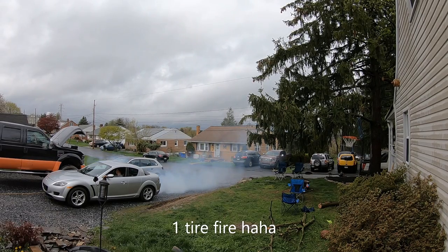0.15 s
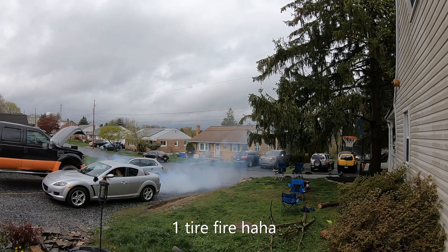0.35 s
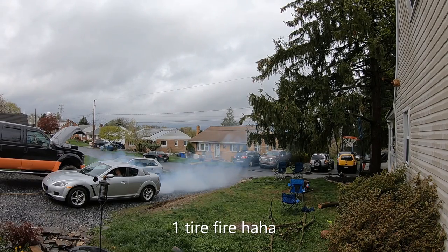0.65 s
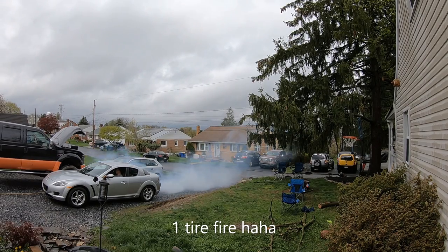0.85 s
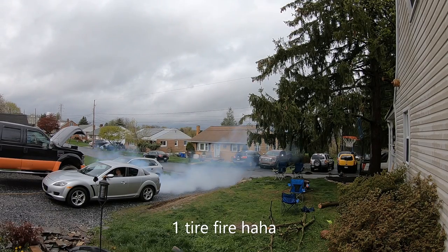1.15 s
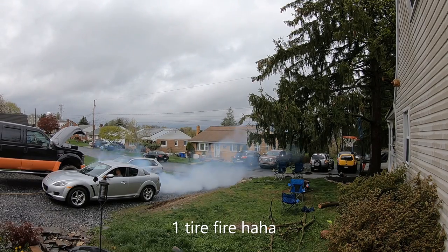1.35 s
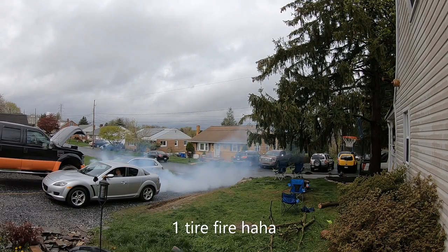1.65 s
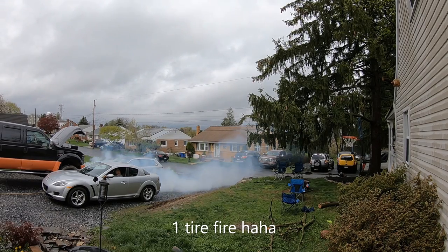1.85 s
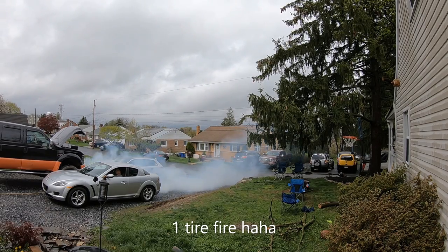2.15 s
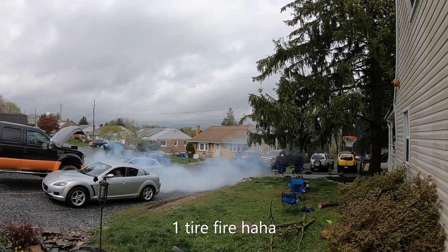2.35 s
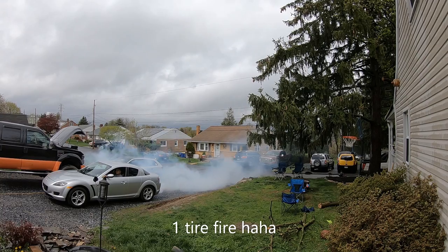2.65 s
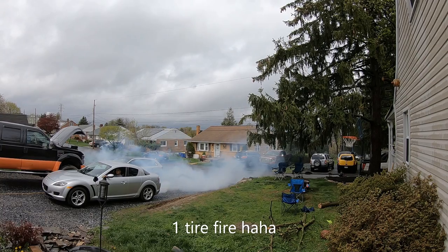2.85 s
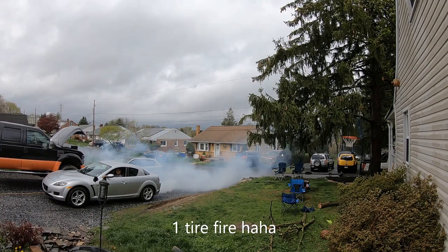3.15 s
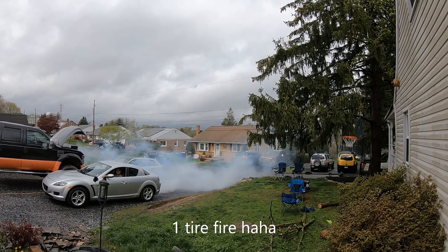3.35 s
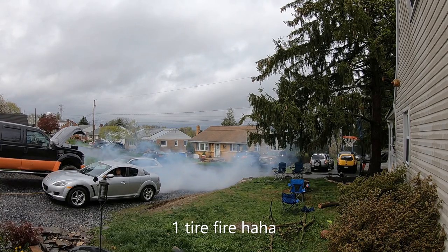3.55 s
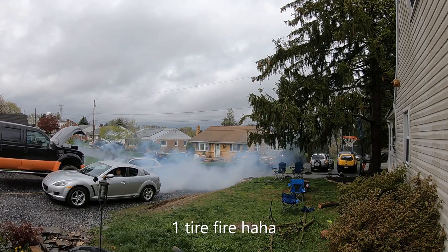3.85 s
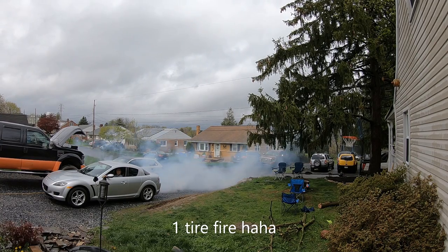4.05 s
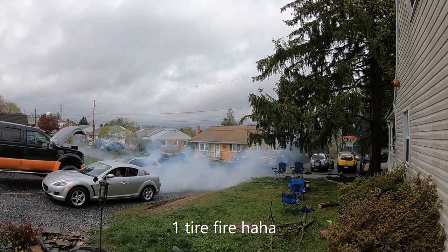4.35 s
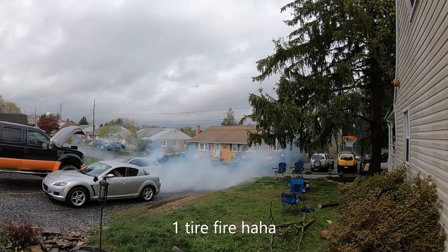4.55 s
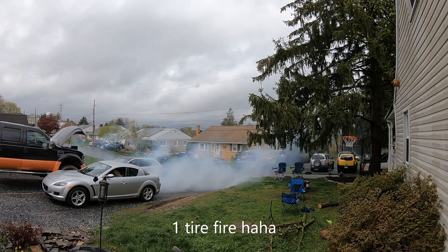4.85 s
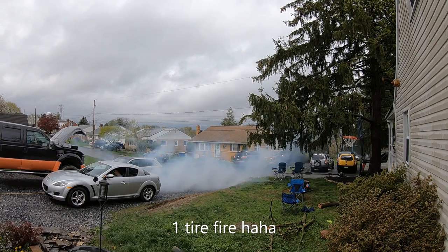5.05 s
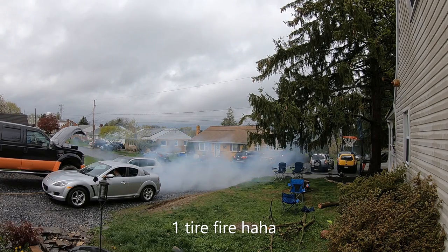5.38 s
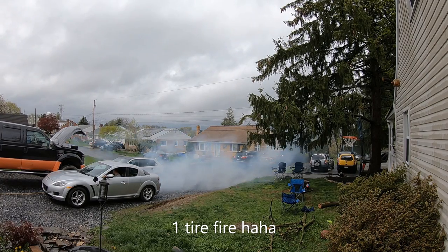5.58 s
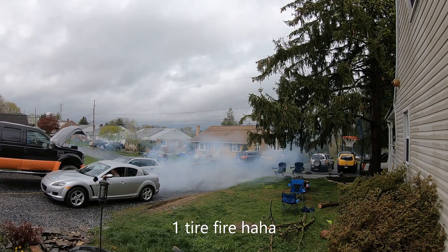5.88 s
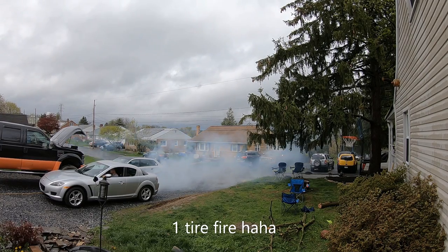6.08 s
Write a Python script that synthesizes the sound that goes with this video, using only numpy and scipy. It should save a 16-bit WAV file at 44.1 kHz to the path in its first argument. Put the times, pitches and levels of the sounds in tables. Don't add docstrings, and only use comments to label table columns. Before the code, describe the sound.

A loud open-exhaust car engine howls at high revs, labours down raspingly, drops with two small pops to a lumpy idle, then begins revving up again.

```python
import sys
import numpy as np
from scipy import signal
from scipy.fft import rfft, irfft, next_fast_len
from scipy.io import wavfile
from scipy.ndimage import uniform_filter1d, map_coordinates

SR = 44100
rng = np.random.default_rng(int(sys.argv[2]) if len(sys.argv) > 2 else 0)


def invert_db(level):
    return 10 ** (np.asarray(level, dtype=float) / 20)


def generate_wav(sig):
    pcm = np.round(np.clip(np.atleast_2d(sig).T, -1, 1) * 32767).astype(np.int16)
    wavfile.write(sys.argv[1], SR, pcm)


N = 274302

# time_s, firing_rate_hz
FIRING_RATE = [(0, 170.8), (.09, 164.6), (.16, 151.8), (.28, 119.3), (.6, 109.3), (1, 90.9), (1.3, 82.06),
               (1.8, 74.95), (1.92, 61.25), (2.03, 55.35), (2.15, 46.59), (2.33, 38.95), (2.54, 33.41),
               (3.2, 34.9), (4.15, 32.35), (5.2, 32.53), (5.42, 34.01), (6.22, 51)]
# time_s, level_db
BOOM_LEVEL = [(.09, -10), (.16, -14.5), (.24, -12.5), (.3, -14), (.55, -16.5), (.7, -21), (.8, -15.5),
              (1.05, -11.5), (1.8, -14), (1.86, -17), (2.04, -17), (2.18, -23), (2.32, -17.5), (2.5, -23.5),
              (2.65, -22), (5.45, -23), (5.64, -20.5), (6.22, -19.5)]
# time_s, flow_db
GAS_FLOW = [(0, -29.5), (.08, -33), (.13, -26), (.21, -27.5), (.33, -34), (1.1, -34), (1.8, -35.5),
            (1.9, -40.5), (1.98, -50), (2.15, -57), (2.27, -50.5), (5.46, -53.5), (5.56, -48.5), (5.9, -45),
            (6.22, -41)]
# firing_rate_hz, late_ms
ROTOR_LATENESS = [(50, .15), (75, .06), (82, .04), (91, .15), (102, .16), (111, .06), (170, .01)]
# pitch_hz, level_db
BOOM_SHUT = [(20, -52.5), (33, -31.5), (66, -2), (101, -7.5), (132, 2), (163, 5.5), (192, -2), (207, -5.5),
             (232, -3.5), (258, -11), (285, -37.5), (335, -14.5), (380, -25), (450, -54.5)]
# pitch_hz, level_db
BOOM_LOAD = [(30, -55), (76, -15), (104, -13), (116, -4), (140, -12.5), (175, 1), (207, -4.5), (238, -3.5),
             (268, -6.5), (308, -20), (337, -9.5), (362, -17), (405, -16), (470, -65.5)]
# pitch_hz, width_hz, depth_db
SIDE_BRANCH_DIPS = [(68.2, 5.2, -8.5), (95.4, 8.1, -9.5), (205.1, 9.3, -15.5), (313, 16, -7),
                    (361, 16, -7.5)]
# pitch_hz, width_hz, level_db
BARK_MODES = [(425, 25, -4), (470, 22, -8), (505, 26, -7), (542, 28, -2), (585, 28, 0), (665, 22, -7),
              (735, 22, -4), (795, 28, -6), (942, 24, -1), (1145, 22, -4)]
# pitch_hz, level_db
JET_SPECTRUM = [(600, -12.5), (1000, -14), (1500, -17), (2500, -19.5), (4400, -20), (6200, -18),
                (8100, -22.5), (10100, -30.5), (11200, -38), (13200, -37.5), (15500, -61.5)]
# pitch_hz, width_hz, shut_level_db, load_level_db
TAIL_PIPE_MODES = [(1380, 30, 13, -6), (1690, 60, -30, 9), (1755, 28, -2, -10), (1950, 32, -30, 2),
                   (2110, 80, 5, -4), (2310, 26, -12, 0), (2760, 30, 0, -20), (2970, 45, -3, -6),
                   (3290, 45, 2, -6), (3440, 90, -8, 2), (3950, 60, 0, -12), (4250, 60, 0, -30),
                   (4500, 100, -1, -5), (5520, 90, -20, -7), (5850, 50, -3, -20), (6350, 70, -6, -8)]
# start_s, peak_db
AFTERFIRES = [
    (2.358, -25),
    (2.4157, -33.5),
]
# pitch_hz, t60_s
YARD_DECAY = [(100, 0.85), (1000, 1), (8000, 0.037)]
# pitch_hz, level_db
AIR_SPECTRUM = [(20, -12), (40, 0), (200, -8), (600, -24), (2000, -34), (7000, -38), (11000, -55),
                (16000, -90)]


def unit(x):
    return x / np.sqrt(np.mean(x ** 2) + 1e-20)


def steady(x, span_s):
    width = round(span_s * SR)
    power = uniform_filter1d(uniform_filter1d(x ** 2, width), width // 2)
    return x / np.sqrt(np.abs(power) + 1e-12)


def curve(rows):
    s, value = np.transpose(rows)
    return np.interp(np.arange(N) / SR, s, value)


def along(points, hz):
    f, v = np.transpose(points)
    return np.interp(np.log(hz + 1), np.log(f + 1), v)


def wobble(rate_hz):
    knots = rng.standard_normal(int(N * rate_hz / SR) + 4)
    return map_coordinates(knots, [np.arange(N) * rate_hz / SR])


def filtered(x, response, before=0):
    m = 2 * next_fast_len(N // 2 + SR // 4)
    long = np.concatenate([x, np.zeros(m - N - before), x[:before]])
    return irfft(rfft(long) * response(np.fft.rfftfreq(m, 1 / SR)), m)[:N]


def causal(points):
    def response(hz):
        cepstrum = irfft(np.log(invert_db(along(points, hz)) + 1e-6))
        half = len(cepstrum) // 2
        cepstrum[1:half] *= 2
        cepstrum[half + 1:] = 0
        return np.exp(rfft(cepstrum))
    return response


def modes(f, table):
    total = 0
    for k, (c, w, db) in enumerate(table):
        total = total + (-1) ** k * invert_db(db) * 1j * f * w / (c * c - f * f + 1j * f * w)
    return total


def pulses(at, size):
    cell = np.clip(np.floor(at), 0, N).astype(int)
    part = at - cell
    first = np.bincount(cell, size * (1 - part), N + 2)
    second = np.bincount(cell + 1, size * part, N + 2)
    return (first + second)[:N]


def firings(rate):
    turns = np.cumsum(rate) / SR + 0.297
    count = np.arange(1, int(turns[-1]) + 1)
    at = np.interp(count, turns, np.arange(N))
    rotor = (-1) ** count
    late_ms = along(ROTOR_LATENESS, rate)[at.astype(int)]
    jitter_ms = 0.017 * rng.standard_normal(len(at))
    return at + SR / 1000 * (rotor * late_ms + jitter_ms), rotor


def silencer(f):
    centre_hz, width_hz = 153.7, 102.4
    real, imag = centre_hz ** 2 - f * f, 1j * f * width_hz
    return (real - imag) / (real + imag)


def notches(f):
    dips = [(c * c - f * f + 1j * f * w * invert_db(db)) / (c * c - f * f + 1j * f * w)
            for c, w, db in SIDE_BRANCH_DIPS]
    return np.prod(dips, axis=0)


def pipe_boom(at, rotor, load, load_at_firing):
    stumble_db = 2.5 * load_at_firing * (1 - load_at_firing)
    blows = pulses(at, -invert_db(0.3 * rotor + (0.5 + stumble_db) * rng.standard_normal(len(at))))
    before = round(at[12] - at[0])
    boom = filtered(blows * (1 - load), causal(BOOM_SHUT))
    boom = boom + filtered(blows * load, causal(BOOM_LOAD), before=before)
    return filtered(boom, lambda f: silencer(f) * notches(f) * (1 + 1j * f / 900) ** -4, before=before)


def gas_puffs(at, rotor):
    t = np.arange(SR // 10) / SR
    puff = (1 - np.exp(-t / 0.0025)) * np.exp(-(t / 0.024) ** 3)
    size = invert_db(2.8 * rotor + 0.8 * rng.standard_normal(len(at)))
    flow = signal.fftconvolve(pulses(at, size), puff)[:N]
    return steady(0.7 + np.abs(flow), 0.15)


def pipe_bark(at, rotor, load, load_at_firing, flow):
    luck = rng.standard_normal(len(at))
    edge = pulses(at, invert_db(3.5 * (1 - load_at_firing) * rotor + 0.6 * luck))
    edge = edge + 0.6 * (1 - load) * np.roll(edge, round(0.0119 * SR))
    turbulence = (1 + flow) * rng.standard_normal(N)
    rounded = lambda f: modes(f, BARK_MODES) / (1 + 1j * f / 1300) ** 4
    return unit(filtered(edge, rounded)) + (0.22 + 0.5 * load) * unit(filtered(turbulence, rounded))


def patchy(depth_db):
    hz, t, z = signal.stft(rng.standard_normal(N), SR, nperseg=512)
    field = uniform_filter1d(rng.standard_normal(z.shape), size=3, axis=0)
    field = uniform_filter1d(field, size=4, axis=1)
    by_pitch = np.clip(hz / 3000, 0, 1) * np.clip(7000 / (hz + 1), 0, 1)
    depth = np.outer(by_pitch, np.interp(t * SR, np.arange(N), depth_db))
    return signal.istft(z * invert_db(depth * unit(field)), nperseg=512)[1][:N]


def tail_pipe(f, column):
    table = [(row[0], row[1], row[column]) for row in TAIL_PIPE_MODES]
    return invert_db(along(JET_SPECTRUM, f)) * (1 + np.abs(modes(f, table)))


def gas_rasp(flow, load):
    gas = flow * invert_db(0.8 * wobble(400)) * patchy(depth_db=3.6 - 1.6 * load)
    shut = filtered(gas * (1 - load), lambda f: tail_pipe(f, column=2))
    loaded = filtered(gas * load, lambda f: tail_pipe(f, column=3) / (1 + (f / 9000) ** 2))
    return shut + loaded


def swapped(x, rate, load):
    centre_hz, width_hz = 1120, 404
    band = filtered(x, lambda f: np.exp(-((f - centre_hz) / width_hz) ** 4))
    later = np.interp(np.arange(N) - SR / rate, np.arange(N), band)
    return x + (1 - load) ** 2 * (later - band)


def afterfire(rasp_db):
    t = np.arange(SR // 10) / SR
    lifted = rasp_db.copy()
    for start_s, peak_db in AFTERFIRES:
        lifted[round(start_s * SR):][:len(t)] += np.clip(peak_db + 35.5, 0, 20) * np.exp(-(t / 0.026) ** 3)
    return lifted


def engine():
    rate, boom_db, rasp_db = curve(FIRING_RATE), curve(BOOM_LEVEL), curve(GAS_FLOW)
    shut_db, open_db = -51, -36
    load = np.clip((rasp_db - shut_db) / (open_db - shut_db), 0, 1) ** 1.7
    overrun_db = shut_db + 5.5 * np.log2(rate / 33.4)
    bark_db = np.maximum(rasp_db, overrun_db) + 3.63 + 2 * load
    nominal_turns = np.cumsum(rate) / SR + 0.297
    on_time = np.interp(np.arange(1, int(nominal_turns[-1]) + 1), nominal_turns, np.arange(N))
    load_at_firing = load[on_time.astype(int)]
    at, rotor = firings(rate)
    boom = pipe_boom(at, rotor, load, load_at_firing)
    flow = gas_puffs(at, rotor)
    bark = pipe_bark(at, rotor, load, load_at_firing, flow)
    rasp = gas_rasp(flow, load)
    upper = invert_db(bark_db - 4.5) * steady(bark, 0.15)
    upper = upper + invert_db(afterfire(rasp_db) - 0.7) * steady(rasp, 0.21)
    return invert_db(boom_db + 1.79) * steady(boom, 0.079) + swapped(upper, rate, load)


def yard(x):
    hz, t, z = signal.stft(rng.standard_normal(SR // 2), SR, nperseg=256)
    decay = invert_db(-60 * t / along(YARD_DECAY, hz)[:, None])
    tail = signal.istft(z * decay, SR, nperseg=256)[1]
    delayed = np.pad(x, (600, 0))
    return signal.fftconvolve(delayed, tail / np.linalg.norm(tail))[:N]


def air():
    noise = filtered(rng.standard_normal(N), lambda f: invert_db(along(AIR_SPECTRUM, f)))
    return invert_db(-50 + 1.5 * wobble(2)) * unit(noise)


def scene():
    car = engine()
    return (car + invert_db(-19) * yard(car) + air())[None]


def low_pass(x):
    return signal.sosfilt(signal.butter(12, 15700, fs=SR, output="sos"), x)


def record(dry):
    recover_s, length_s = 2.906, 0.73
    rise = np.clip((np.arange(N) / SR - recover_s) / length_s, 0, 1)
    return low_pass(dry * invert_db(4 * rise))


dry = scene()
out = record(dry)
generate_wav(out)
```